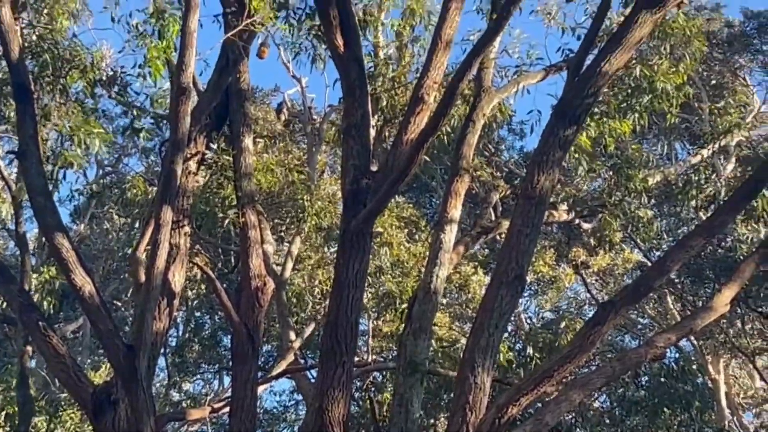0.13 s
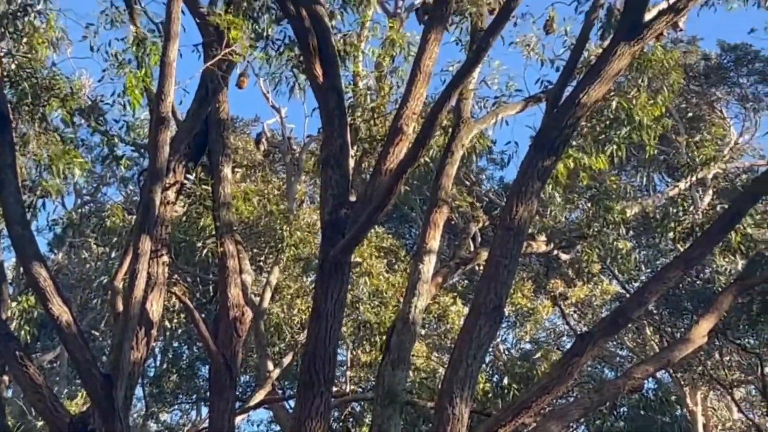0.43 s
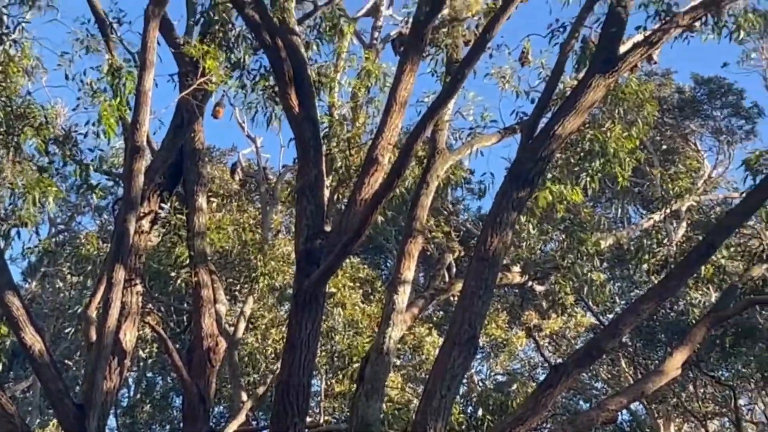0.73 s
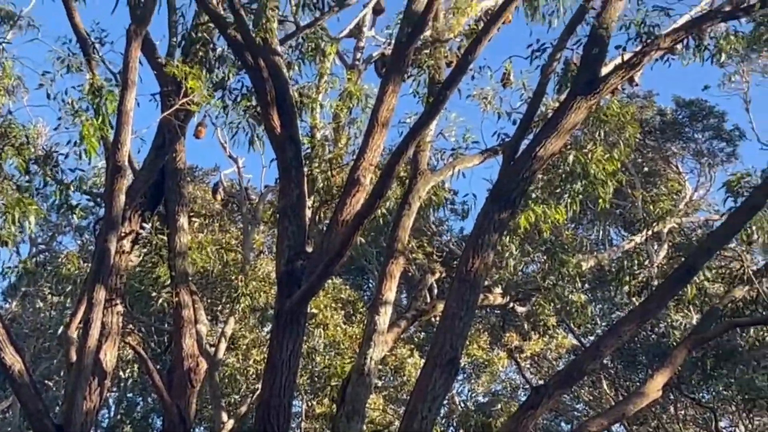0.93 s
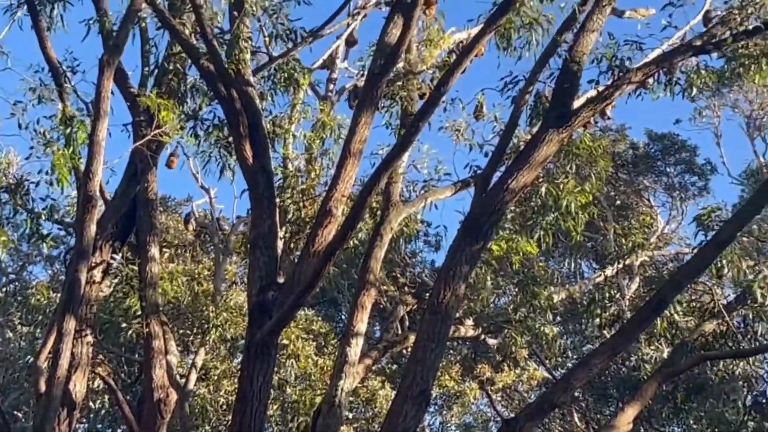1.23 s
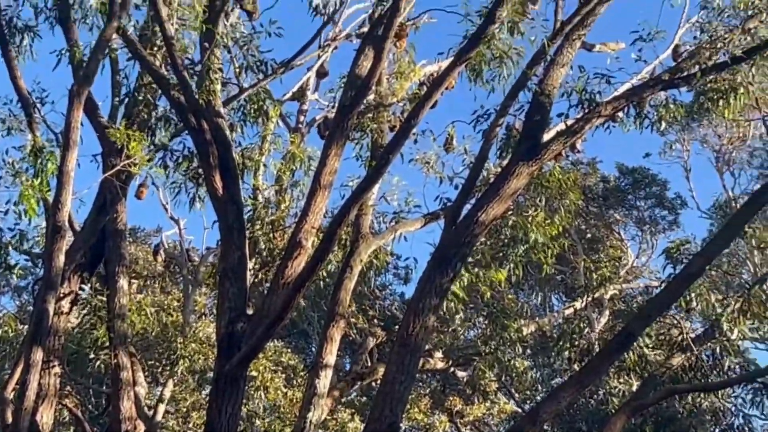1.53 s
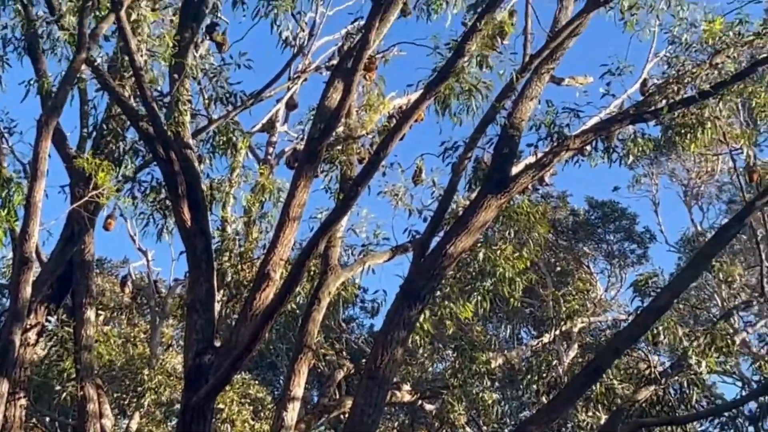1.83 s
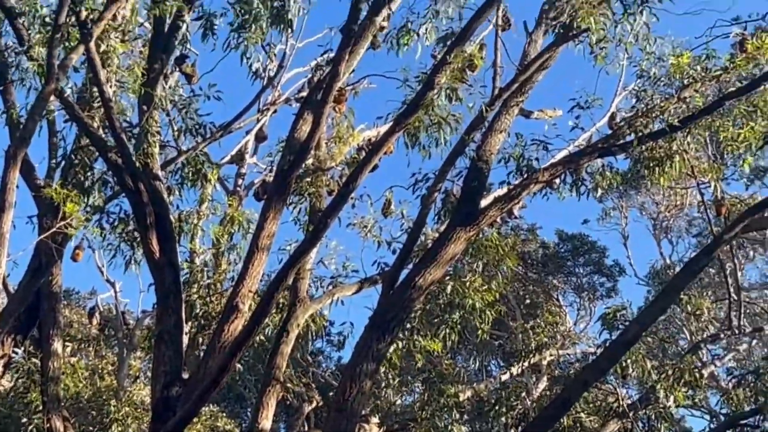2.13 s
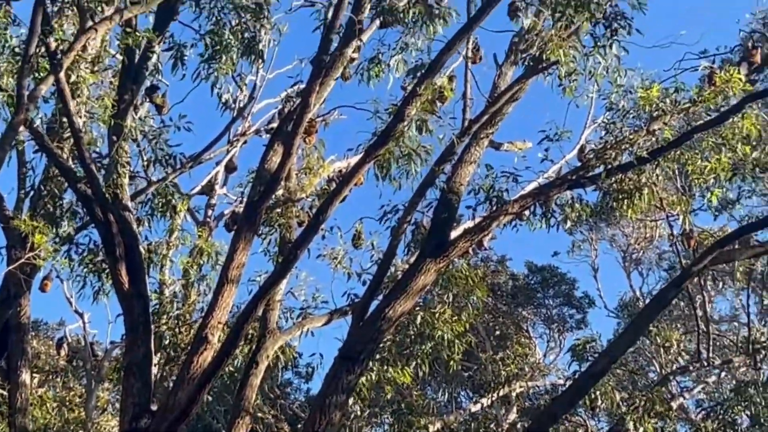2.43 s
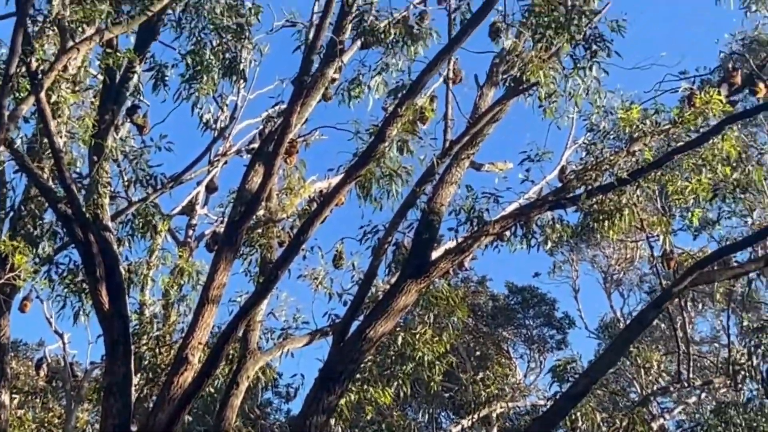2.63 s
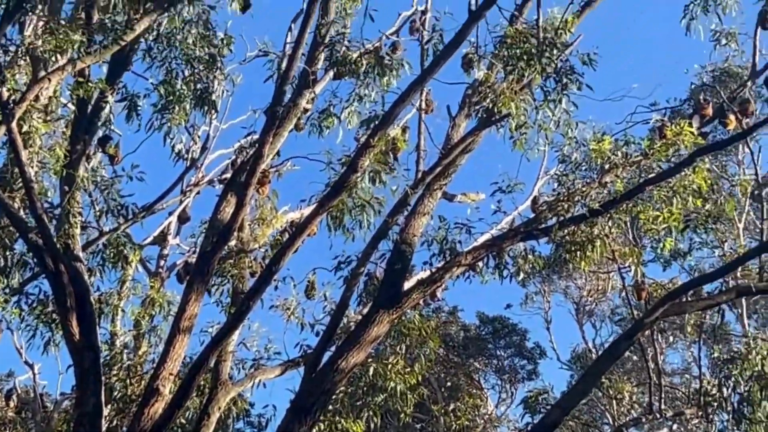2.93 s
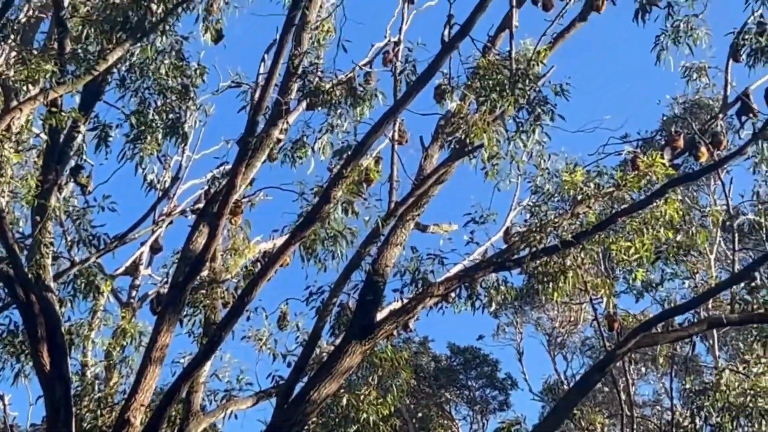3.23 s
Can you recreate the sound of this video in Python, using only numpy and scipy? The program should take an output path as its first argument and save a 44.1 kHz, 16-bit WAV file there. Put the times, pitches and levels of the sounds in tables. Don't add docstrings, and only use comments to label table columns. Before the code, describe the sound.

A colony of fruit bats chatters and screeches overhead, with faint leaf hiss and far road rumble

```python
import sys
import numpy as np
from scipy import signal
from scipy.fft import rfft, irfft
from scipy.io import wavfile
from scipy.ndimage import uniform_filter1d

SR = 44100
rng = np.random.default_rng(int(sys.argv[2]) if len(sys.argv) > 2 else 0)


def store_pcm(level_fs):
    pcm = np.round(np.clip(level_fs, -1, 1) * 32767).astype(np.int16)
    wavfile.write(sys.argv[1], SR, np.atleast_2d(pcm).T)


def elevation(decibels):
    levels = np.asarray(decibels, float)
    return 10 ** (levels / 20)


N = 148617


def evened(x):
    return x / np.sqrt(np.mean(x ** 2) + 1e-20)


def read(points, hz):
    f, value = np.transpose(points)
    return np.interp(np.log(hz + 1), np.log(f + 1), value)


def along(points):
    start_s, value = np.transpose(points)
    return np.interp(np.arange(N) / SR, start_s, value)


def add(mix, start_s, sound, left=0):
    part = mix[:, round(start_s * SR):][:, :len(sound)]
    part += np.outer([1 + left, 1 - left], sound[:part.shape[1]])


def wobble(size, span_s):
    span = int(span_s * SR) + 1
    drift = uniform_filter1d(rng.standard_normal(size + 8000), span)
    return evened(uniform_filter1d(drift, span))[:size]


def voice(hz, throat, rough, breath=0):
    size = len(hz)
    turns = np.cumsum(hz * (1 + .012 * rough * wobble(size, .006))) / SR
    tone = np.zeros(size)
    for k in range(1, int(15500 / hz.max()) + 1):
        flutter = elevation(7 * rough * wobble(size, .005))
        partial = np.sin(2 * np.pi * (k * turns + k * k / 7))
        tone += elevation(read(throat, k * hz)) * flutter * partial
    throat_gain = elevation(read(throat, np.fft.rfftfreq(size, 1 / SR)))
    hiss = irfft(rfft(rng.standard_normal(size)) * throat_gain, size)
    breath = np.clip(breath, 0, 1)
    return np.sqrt(1 - breath) * evened(tone) + np.sqrt(breath) * evened(hiss)


def call(length_s, top_hz, level_db, throat, rough, arch=0, depth=0, glide=0, breath=0, rise=0.13, fade=0.24):
    throb_hz, throb_pitch, throb_db = 76, .025, 2.5
    t = np.arange(0, length_s, 1 / SR)
    u = t / length_s
    beats = np.cumsum(throb_hz * (1 + 0.15 * wobble(len(t), 0.0098))) / SR
    beat = np.clip(beats.astype(int), 0, 39)
    own_pitch, own_level = (rng.standard_normal((40, 2))[beat] * depth).T
    bend = (1 - arch * (2 * u - 1) ** 2) * (1 + glide * (u - .5))
    hz = top_hz * bend * (1 + throb_pitch * own_pitch)
    throb = 1 - np.clip(depth, 0, 1) * np.cos(np.pi * beats) ** 2
    shape = np.minimum(u / rise, 1) * np.minimum((1 - u) / fade, 1)
    level = elevation(level_db + throb_db * uniform_filter1d(own_level, size=90))
    return level * shape * throb ** 2 * voice(hz, throat, rough, breath)


# start_s [s], length_s [s], pitch_hz [Hz], level_db [dB], breath [share 0-1]
TRILL_CALLS = [(0.108, 0.11, 1250, -68, 0.6), (0.197, 0.14, 1347, -52.5, 0.7),
               (0.335, 0.18, 2090, -50, 0.8), (0.611, 0.155, 1378, -43.5, 0.8),
               (1.076, 0.19, 1980, -53.5, 1), (1.25, 0.1, 2000, -47.5, 0.84),
               (1.418, 0.16, 2020, -47.5, 0.82), (1.534, 0.068, 1955, -48, 1),
               (1.938, 0.048, 2780, -49.5, 0.34), (2.4, 0.031, 2080, -67, 0.6),
               (2.97, 0.075, 590, -51.5, 0.89), (3.059, 0.23, 1330, -49.5, 0.73),
               (3.242, 0.103, 2138, -46.5, 0.72)]
# pitch_hz [Hz], level_db [dB]
TRILL_COLOUR = [(1200, -16), (2400, 1), (4300, -10), (5900, 0), (7200, -8), (8300, -7), (11000, -11),
                (15000, -22)]


def trills(mix):
    for start_s, length_s, hz, db, breath in TRILL_CALLS:
        depth = .9 * (1 - breath ** 2)
        rise = 0.0045 / length_s + 0.08 * breath ** 3
        sound = call(length_s, hz, db, TRILL_COLOUR, .5, .03, depth, 0, breath, rise, 0.7)
        add(mix, start_s, sound, -.07)


# start_s [s], pitch_hz [Hz], level_db [dB]
SQUEAK_CALLS = [(.113, 1210, -54), (.125, 1240, -49), (0.135, 1330, -57), (.146, 1226, -49),
                (.158, 1440, -47.5), (.175, 1400, -56), (.188, 1420, -50), (.201, 1360, -57),
                (0.212, 1300, -48), (0.229, 1310, -43.5), (0.239, 1300, -47.5), (.252, 1340, -56),
                (0.262, 1375, -47), (0.274, 1290, -50), (0.285, 1624, -44), (.299, 1610, -41.5),
                (.312, 1466, -45), (.324, 1500, -55), (.332, 2150, -52), (.344, 2010, -45.5),
                (.357, 2156, -43), (.371, 1895, -45.5), (.383, 1910, -47), (.395, 2230, -45),
                (0.416, 2300, -42), (.432, 2235, -44.5), (.758, 1980, -43), (.809, 2110, -53),
                (.839, 2050, -42.5), (1.268, 2030, -48), (1.446, 1925, -42), (1.457, 1980, -36),
                (1.468, 2045, -35.5), (1.480, 2080, -50), (1.490, 1886, -42), (1.551, 1923, -45),
                (1.564, 2010, -45), (1.615, 1870, -49.5), (1.657, 1810, -50), (1.691, 1800, -52.5),
                (1.937, 2755, -47), (2.109, 2150, -58.5), (2.119, 2120, -55), (2.397, 2100, -69),
                (2.408, 2130, -61), (2.986, 2030, -48), (3.242, 2030, -44.5), (3.254, 2170, -45),
                (3.268, 2060, -52)]
# pitch_hz [Hz], level_db [dB]
SQUEAK_COLOUR = [(1200, -20), (2500, 2), (4100, -8), (6200, 1), (7300, -8), (8300, -7), (10500, -10),
                 (15000, -22)]


def squeaks(mix):
    for start_s, hz, db in SQUEAK_CALLS:
        sound = call(0.011, hz, db, SQUEAK_COLOUR, .5, .03, breath=0.14, rise=0.25, fade=0.86)
        add(mix, start_s, sound, -.05)


# start_s [s], length_s [s], pitch_hz [Hz], level_db [dB], glide [share of pitch]
RASP_CALLS = [(0.691, 0.15, 2250, -48.5, 0), (0.857, 0.091, 2760, -44, 0.026),
              (1.348, 0.081, 2055, -45.5, 0.015), (1.416, 0.028, 2156, -38, 0.11),
              (1.455, 0.033, 2114, -37, 0), (1.491, 0.074, 1844, -47, -.1),
              (1.56, 0.099, 1843, -47, -0.0091), (1.651, .09, 1850, -48.5, 0.014),
              (1.938, 0.13, 2706, -61, -0.024), (2.022, 0.04, 4655, -54, -0.14),
              (2.078, 0.043, 4580, -56, 0.11), (2.058, 0.23, 2206, -55, .08), (2.271, 0.24, 2470, -63, .05),
              (2.935, 0.11, 2377, -50, -0.0079), (3.032, .085, 2565, -49, .05),
              (3.159, 0.089, 3400, -51.5, 0), (.592, 0.0325, 3340, -44, 0.255)]


def rasps(mix):
    for start_s, length_s, hz, db, glide in RASP_CALLS:
        band = [(0.73 * hz, -28), (hz, 0), (1.37 * hz, -24), (4 * hz, -45)]
        sound = call(length_s, hz, db, band, .8, 0, 0.35, glide, breath=.4, rise=0.11)
        add(mix, start_s, sound, -.4 if 1.3 < start_s < 2.5 else -.05)


# start_s [s], length_s [s], pitch_hz [Hz], level_db [dB]
SQUEAL_CALLS = [
    (2.594, .06, 1126, -52),
    (2.743, .044, 1092, -54),
]
# pitch_hz [Hz], level_db [dB]
SQUEAL_COLOUR = [(2200, -26), (3400, -1), (4400, -5), (5500, -2), (6600, 0), (8700, -4), (9600, -20),
                 (12000, -32)]


def squeals(mix):
    for start_s, length_s, hz, db in SQUEAL_CALLS:
        add(mix, start_s, call(length_s, hz, db, SQUEAL_COLOUR, .8, .13, glide=-.07, breath=.08))


# start_s [s], length_s [s], pitch_hz [Hz], level_db [dB], glide [share of pitch]
WHISTLE_CALLS = [(0.015, 0.033, 3230, -54.5, 0.041), (0.36, 0.008, 2220, -39, -0.037),
                 (0.398, 0.009, 2320, -41.5, 0.055), (0.414, 0.0089, 2360, -32.5, 0.0014),
                 (0.416, 0.044, 3530, -48, 0.0085), (0.572, 0.034, 2540, -48, 0.13),
                 (0.618, 0.06, 2230, -37, -.03), (0.641, 0.012, 2260, -32, -0.055),
                 (0.654, 0.011, 2230, -28.5, 0.074), (.612, 0.036, 5500, -51, 0),
                 (1.31, 0.044, 1900, -43.5, 0.045), (1.312, 0.12, 1069, -53, 0.0034),
                 (1.35, 0.042, 5270, -50.5, -0.051), (1.772, 0.041, 2205, -51.5, 0.047),
                 (1.939, .06, 2740, -53, 0), (2.405, 0.016, 4080, -51.5, 0.015), (2.028, .02, 4500, -61, 0),
                 (2.135, 0.083, 4060, -57, -0.0047), (2.36, 0.038, 2363, -51.5, -0.0039),
                 (2.891, 0.024, 3400, -53, 0.01), (3.05, 0.028, 2543, -51, 0.03),
                 (3.115, 0.05, 3412, -41.5, 0.064), (3.176, 0.026, 1433, -56, -0.15),
                 (3.271, 0.016, 1260, -52.5, -0.027)]


def whistles(mix):
    for start_s, length_s, hz, db, glide in WHISTLE_CALLS:
        pure = [(hz, 0), (2 * hz, -22), (4 * hz, -40)]
        arched = abs(glide) > .045 or hz < 1150
        arch = .075 * min(length_s / 0.0493, 2) * arched
        sound = call(length_s, hz, db, pure, .5, arch, .15, glide, rise=0.12)
        add(mix, start_s, sound, -.45 if 1.3 < start_s < 2.5 else -.08)


# start_s [s], length_s [s], pitch_hz [Hz], level_db [dB]
CHIRP_CALLS = [
    (1.146, 0.105, 2341, -46.5),
    (2.967, 0.042, 1180, -59),
    (2.97, 0.041, 1757, -51.5),
    (3.262, 0.025, 2900, -49),
]


def chirps(mix):
    for start_s, length_s, hz, db in CHIRP_CALLS:
        pure = [(hz, 0), (2 * hz, -15), (4 * hz, -40)]
        sound = call(length_s, hz, db, pure, .5, glide=-.28 * (start_s > 3), rise=0.035)
        add(mix, start_s, sound, -.35)


# start_s [s], pitch_hz [Hz], level_db [dB]
SCREECH_PATH = [
    (.85, 447.8, -48),
    (0.874, 466, -50),
    (0.913, 504, -46.5),
    (0.948, 458.3, -45),
    (1.06, 465.5, -42.5),
    (1.109, 487.8, -42),
    (1.2, 474.3, -43),
    (1.321, 439, -49.5),
]
# pitch_hz [Hz], level_db [dB]
SCREECH_COLOUR = [(1400, -35), (1850, -3), (2300, 4), (2800, -6), (3700, -4.5), (4600, -11.5),
                  (5600, -20.5), (14000, -36)]


def screech(mix):
    start_s, hz, db = np.transpose(SCREECH_PATH)
    t = np.arange(start_s[0], start_s[-1], 1 / SR)
    cry = voice(np.interp(t, start_s, hz), SCREECH_COLOUR, .63, .38)
    add(mix, start_s[0], elevation(np.interp(t, start_s, db)) * cry, -.17)


def near_bats():
    mix = np.zeros((2, N))
    for bats in (trills, squeaks, rasps, squeals, whistles, chirps, screech):
        bats(mix)
    return mix


# start_s [s], level_db [dB]
CHORUS_SWELL = [
    (0.0, -51.5),
    (0.75, -42),
    (3.37, -52.5),
]
# pitch_hz [Hz], level_db [dB]
CHORUS_COLOUR = [(900, -23), (1500, 4.5), (2300, 5.5), (3300, 2), (4500, -7), (6000, -4.5), (9000, -11),
                 (14000, -29)]


def chorus(count=110):
    mix = np.zeros((2, N))
    for k, (late, size, pitch, soft, side) in enumerate(rng.random((count, 5))):
        sound = call(0.0204 + .12 * size * size, 950 + 1600 * pitch, -9 * soft, CHORUS_COLOUR,
                     0.5, 0.081, size, .3 * side - .15, 0.27)
        add(mix, (k + late) / count * N / SR, sound, 0.43 * side - .45)
    return evened(mix) * elevation(along(CHORUS_SWELL) - 8.0)


# pitch_hz [Hz], t60_s [s]
TRUNK_DECAY = [(1500, .3), (6000, .27), (12000, .18)]


def trunks(x):
    size, gap = SR // 2, 30
    taps = np.zeros((2, size))
    at = np.arange(200, size - gap, gap) + rng.integers(0, gap, (2, (size - 201) // gap))
    np.put_along_axis(taps, at, rng.choice([-1., 1.], at.shape), 1)
    hz, t, z = signal.stft(taps, SR, nperseg=256)
    decay = elevation(-60 * t / read(TRUNK_DECAY, hz)[:, None])
    tail = signal.istft(z * decay, SR, nperseg=256)[1]
    return signal.fftconvolve(x, tail / np.linalg.norm(tail[0]), axes=1)[:, :N]


# pitch_hz [Hz], likeness [-1 to 1]
LIKENESS = [(60, 0.99), (380, 0.91), (2380, 0.18), (15000, 1)]


def wash(spectrum, level_db, patchy_db, swell_db, size):
    frames, hz = N * 4 // size + 5, np.fft.rfftfreq(size, 1 / SR)
    a, b, c, d, patches = rng.standard_normal((frames, len(hz), 5)).T
    patches = evened(uniform_filter1d(uniform_filter1d(patches, 10, 0), 10, 1))
    swell = evened(uniform_filter1d(rng.standard_normal(frames), 12))
    same = np.clip(read(LIKENESS, hz), -1, 1)[:, None]
    left = a + 1j * b
    right = same * left + np.sqrt(1 - same ** 2) * (c + 1j * d)
    z = np.array([left, right])
    z *= elevation(read(spectrum, hz)[:, None] + patchy_db * patches + swell_db * swell)
    noise = signal.istft(z, nperseg=size, noverlap=size * 3 // 4)[1][:, :N]
    return elevation(level_db) * evened(noise)


# pitch_hz [Hz], level_db [dB per Hz]
LEAF_COLOUR = [(350, 0.5), (600, -11.5), (1580, -3.5), (2440, 7), (3080, 3.5), (4040, 3), (14200, -22),
               (15600, -34)]


def leaves():
    return wash(LEAF_COLOUR, -55, 4.0, 0.23, size=512)


# start_s [s], level_db [dB]
TRAFFIC_SWELL = [
    (0.0, -36.5),
    (1.99, -35.5),
    (3.37, -38.5),
]
# pitch_hz [Hz], level_db [dB per Hz]
ROAD_COLOUR = [(22, -18), (42, 2), (69, 0.5), (217, -21.5), (319, -24), (724, -35), (1400, -41),
               (1820, -82)]


def traffic():
    return elevation(along(TRAFFIC_SWELL)) * wash(ROAD_COLOUR, 0, 1.0, 0.1, size=4096)


def scene():
    near, far = near_bats(), chorus()
    echoes = trunks(elevation(-9) * near + 0.71 * far)
    return near + 0.49 * far + echoes + traffic() + leaves()


def roll_off(x):
    return signal.sosfilt(signal.butter(12, 15740, fs=SR, output="sos"), x)


# pitch_hz [Hz], level_db [dB]
IMAGE_WIDTH = [(1500, 3), (3000, -8), (10000, -8)]


def record(dry):
    hz = np.fft.rfftfreq(N, 1 / SR)
    notch = elevation(-14 * np.exp(-((hz - 9800) / 280) ** 4))
    bass_cut = 1 / np.sqrt(1 + (39 / (hz + 1)) ** 12)
    colour = notch * bass_cut * (hz < 15740)
    mid = irfft(rfft(dry[0] + dry[1]) * colour, N) / 2
    side = irfft(rfft(dry[0] - dry[1]) * colour * elevation(read(IMAGE_WIDTH, hz)), N) / 2
    return roll_off(np.array([mid + side, mid - side]))


dry = scene()
out = record(dry)
store_pcm(out)
```